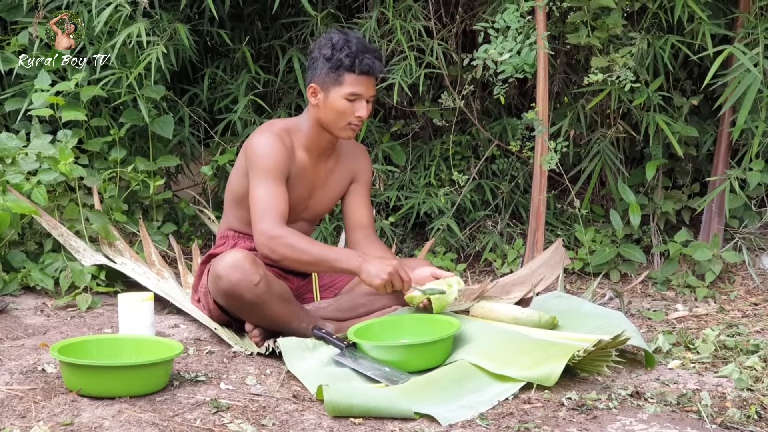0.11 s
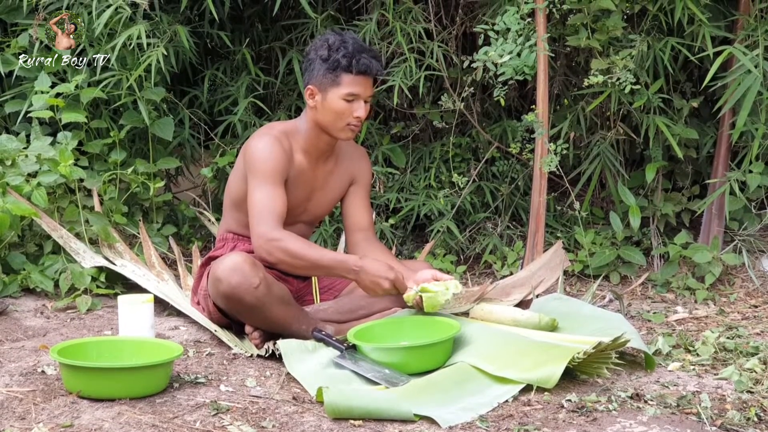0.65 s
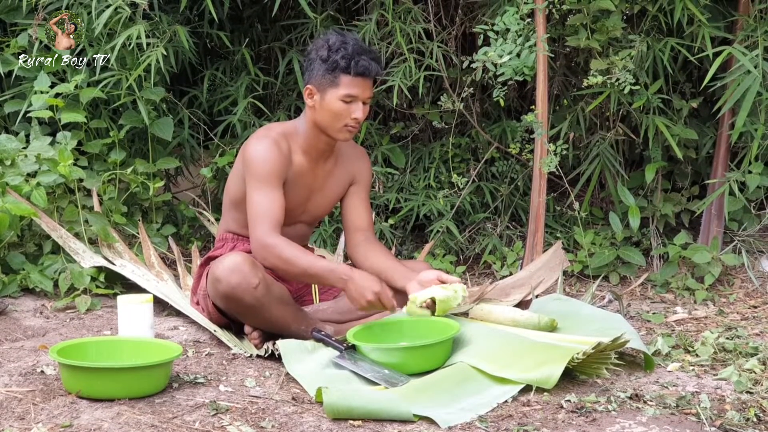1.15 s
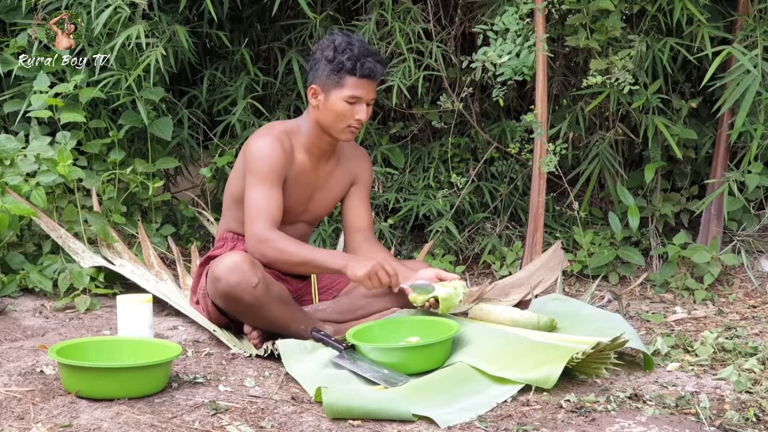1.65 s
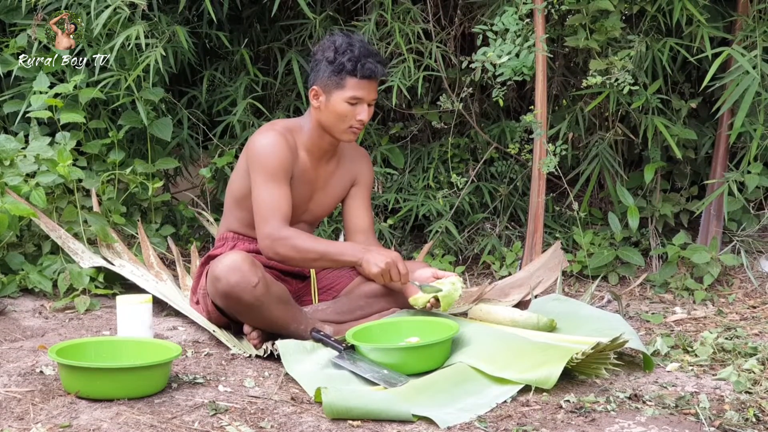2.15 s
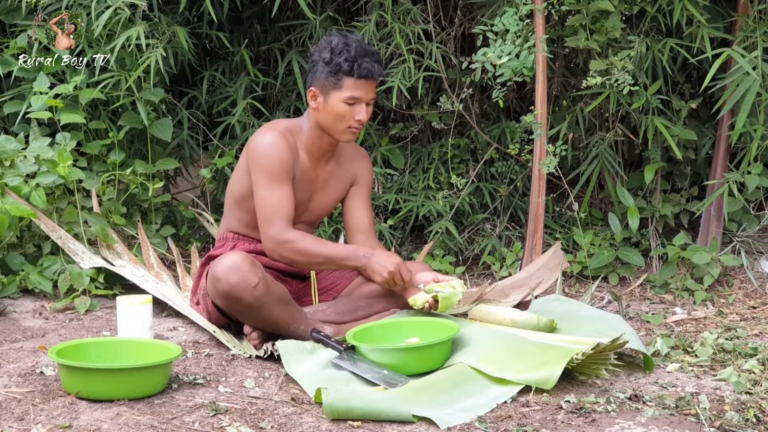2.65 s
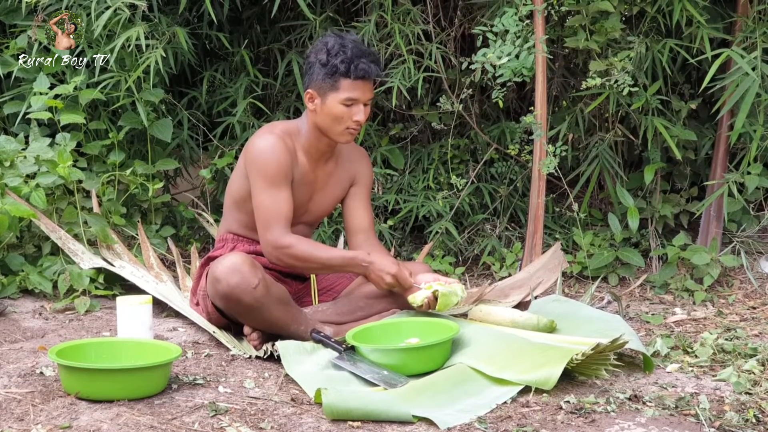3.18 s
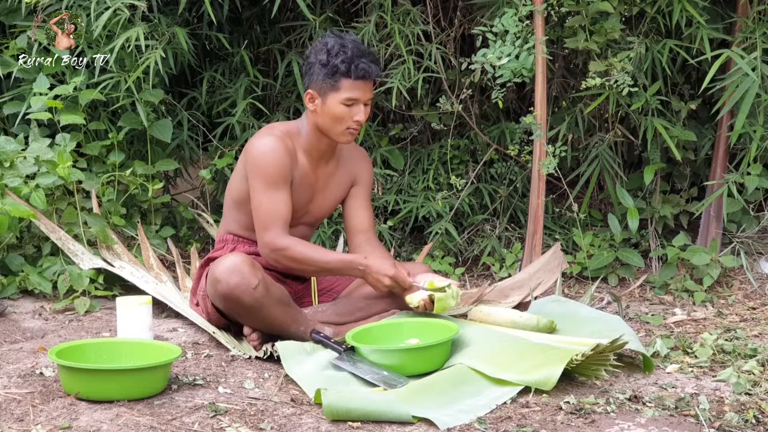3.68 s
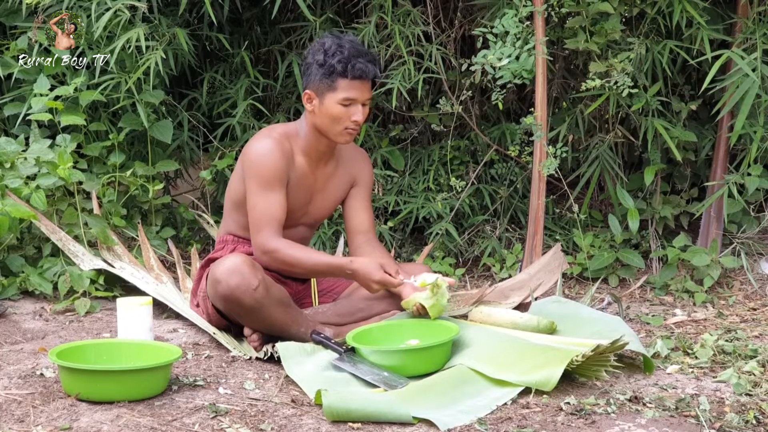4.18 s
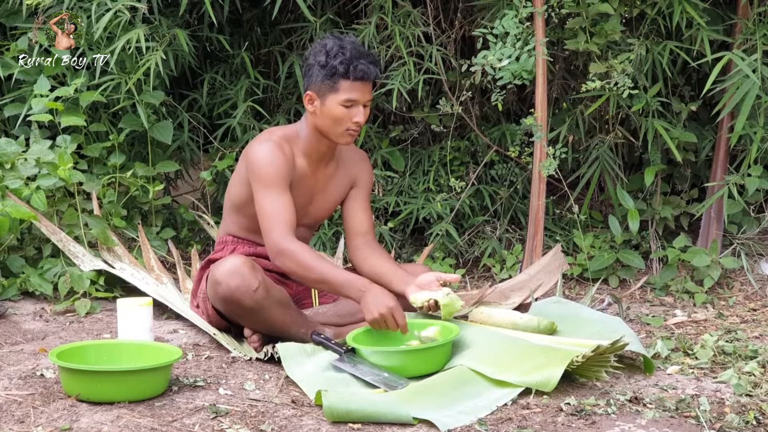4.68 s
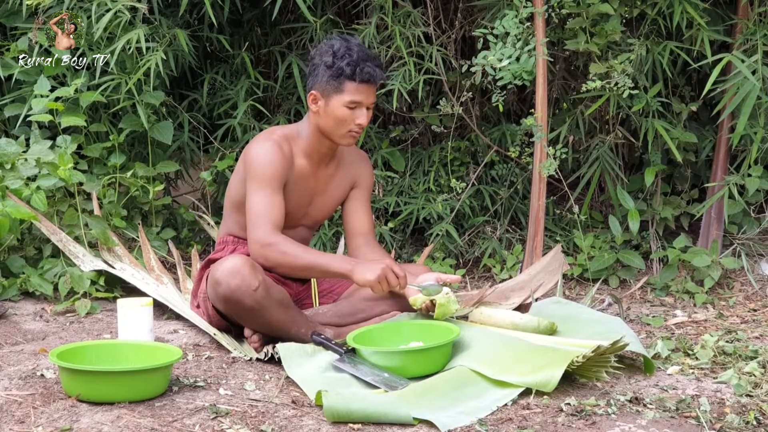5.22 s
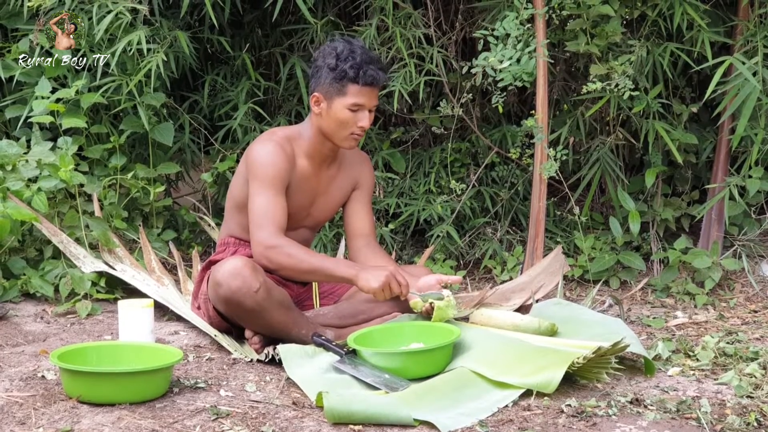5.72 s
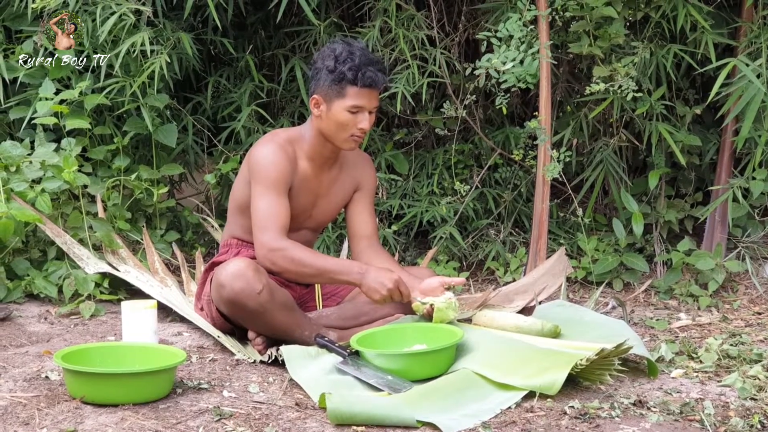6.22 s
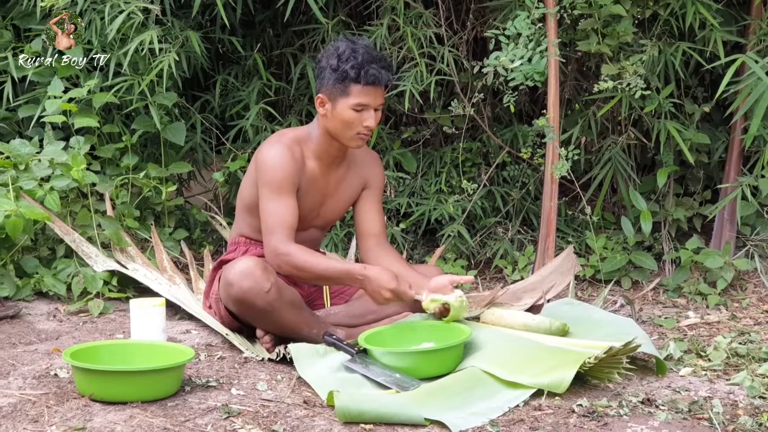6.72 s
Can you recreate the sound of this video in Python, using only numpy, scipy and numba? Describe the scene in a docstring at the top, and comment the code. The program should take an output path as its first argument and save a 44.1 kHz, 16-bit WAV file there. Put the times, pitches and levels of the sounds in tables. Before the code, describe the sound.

Outdoors beside a thicket, a faint engine-like rumble and thin insect hiss lie under small ticks, dull knocks and moist scrapes of a spoon in melon. A sharp snap comes early on the left, then a distant hoarse rooster crows. Sparse birds whistle, a hen clucks briefly, and near the end low bumps and rubbing hit the right side of the stereo microphone.

```python
"""A yard beside a thicket, where a spoon scoops the flesh out of a melon.
Scrapes, squeaks, swishes, rustles and breathy noise around the calls are noise grains under resonances;
ticks, knocks and a snap are struck modes. Far off, a rooster crows in hoarse harmonics, a hen clucks and
birds sing near sines, all with a diffuse tail. Banded noise makes an engine-like rumble and insect hiss;
low noise and decaying swings brush and bump the right side of the microphone."""
import sys
import numpy as np
from scipy import signal
from scipy.io import wavfile
from numba import njit

SR = 44100
rng = np.random.default_rng(int(sys.argv[2]) if len(sys.argv) > 2 else 0)


def natural_amplitude(level_db):
    """Convert a level in decibels to a linear amplitude factor, elementwise."""
    exponent = np.asarray(level_db, float) / 20
    return 10 ** exponent


def digitize_waveform(pressure):
    """Quantize a signal to 16-bit integers and store it at the path in sys.argv[1].

    Rows of a 2-D input are taken as channels; values are limited to [-1, 1].
    """
    field = np.atleast_2d(pressure).T
    bounded = np.clip(field, -1, 1)
    quanta = np.round(bounded * 32767).astype(np.int16)
    wavfile.write(sys.argv[1], SR, quanta)


N = 302085


def rms_one(x):
    """Normalization: the root mean square becomes 1."""
    return x / np.sqrt(np.mean(x ** 2) + 1e-20)


def at_hz(points, hz):
    """Interpolation on a logarithmic frequency axis."""
    points = np.array(points)
    return np.interp(np.log(hz), np.log(points[:, 0]), points[:, 1])


def pan(x, lean_db):
    """Interaural level difference: left minus right is lean_db."""
    return x * natural_amplitude(np.array([[.5], [-.5]]) * lean_db)


def drift(corner_hz, size=N):
    """Low-pass filtered chance: coarse noise through two equal one-pole filters; rms 1."""
    pole = np.exp(-40 * np.pi * corner_hz / SR)      # one coarse step is 20 samples
    coarse = rng.standard_normal(size // 20 + 2002)
    slow = signal.lfilter([1], [1, -2 * pole, pole * pole], coarse)[2000:]
    return np.interp(np.arange(size) / 20, np.arange(len(slow)), rms_one(slow))


def add(out, start, sound):
    """Superposition: lays a sound into the scene from a time on."""
    at = round(max(start, 0) * SR)
    out[:, at:at + sound.shape[1]] += sound[:, :N - at]
    return out


def banded_noise(spectrum, edges, patchy_db, patch_hz):
    """Partially coherent noise: each band has its own level, flicker, likeness and leaning; rms 1."""
    # likeness of the two ears: f/Hz, left-right correlation (clipped to -1..1)
    likeness = [(60, 0.949), (240, 0.807), (950, -0.44), (3770, -0.051), (15000, -0.091)]
    # leaning of the noise: f/Hz, left minus right level/dB
    leaning = [(60, -2), (240, -0.5), (950, 2.5), (3770, 4.0), (15000, 1)]
    out, white = 0, rng.standard_normal((2, 2, N))
    for k, (low, high) in enumerate(zip(edges, edges[1:])):
        band = signal.butter(2, [low, high], "band", fs=SR, output="sos")
        mid, side = signal.sosfilt(band, white[k % 2])
        hz = np.sqrt(low * high)
        alike = np.clip(at_hz(likeness, hz), -1, 1)
        both = np.sqrt(1 + alike) * mid + np.sqrt(1 - alike) * side * [[1], [-1]]
        gain = natural_amplitude(at_hz(spectrum, hz) + patchy_db * drift(patch_hz))
        out = out + gain * pan(both, at_hz(leaning, hz))
    return rms_one(out)


def background():
    """Spectral shaping of noise: a lumpy far rumble under a smooth hiss of insects and leaves."""
    # spectral density of the rumble: f/Hz, relative level/dB per Hz
    rumble_spectrum = [(15, -37), (25, -14.5), (54, 2.5), (88, -0.5), (141, -8.5), (303, -29), (394, -50.5),
                       (500, -26), (650, -70), (1100, -120)]
    # spectral density of the hiss: f/Hz, relative level/dB per Hz
    hiss_spectrum = [(210, -32), (350, -13), (555, -44.5), (739, 3), (1020, -7), (1120, 1.5), (1770, -6.5),
                     (2360, -5.5), (3570, -12), (6860, -7.5), (8310, -21), (13000, -15), (15700, -13.5)]
    # strength of the far rumble: t/s, rms level/dB
    rumble_course = [(0, -45), (.7, -44.5), (1.25, -49.5), (1.8, -46.5), (4, -48.5), (6.85, -48.5)]
    rumble_db = np.interp(np.arange(N) / SR, *np.transpose(rumble_course))
    hiss_db = -66.5
    low, high = np.geomspace(36, 500, 10), np.geomspace(350, 17500, 20)      # band edges in Hz
    rumble = banded_noise(rumble_spectrum, low, patchy_db=2.5, patch_hz=9.3)
    hiss = banded_noise(hiss_spectrum, high, patchy_db=1.3, patch_hz=4.5)
    return natural_amplitude(rumble_db) * rumble + natural_amplitude(hiss_db) * hiss


@njit
def glide(x, hz, q, sr):
    """State-variable resonance: a band-pass whose centre moves."""
    out, low, band = np.zeros(len(x)), 0., 0.
    for i in range(len(x)):
        g = np.tan(np.pi * hz[i] / sr)
        high = (x[i] - (1 / q + g) * band - low) / (1 + g / q + g * g)
        mid = g * high + band
        band = mid + g * high
        low += 2 * g * mid
        out[i] = mid
    return out


def stroke(length, hz0, hz1, q):
    """Granular noise: dense grains drive a resonance that may slide; rms about 1."""
    u = np.linspace(0, 1, round(length * SR))
    hz = hz0 * (hz1 / hz0) ** u
    struck = rng.random(len(u)) < 9000 / SR      # 9000 grains per s
    sizes = natural_amplitude(2 * np.minimum(rng.exponential(1, len(u)), 4)) * struck
    grains = rms_one(sizes) * rng.standard_normal((2, len(u)))
    shaped = np.array([glide(glide(g, hz, q, SR), hz, q / 2, SR) for g in grains])
    swell = 1.166 * np.sin(np.pi * u ** 0.76) ** 1.28
    flutter_db, flutter_hz = .8, 72      # rms depth, corner of the drift
    return swell * natural_amplitude(flutter_db * drift(flutter_hz, len(u))) * rms_one(shaped)


def swishes():
    """Broadband friction: hand and flesh give grains under a very low Q."""
    # swishes: start t/s, length t/s, centre f/Hz, level/dB, left minus right level/dB
    swish_rows = [(0, 0.052, 2480, -63.5, -1), (0.284, 0.12, 10000, -71, 8), (1.159, .47, 8300, -66, -2),
                  (1.714, 0.08, 2000, -66.5, -1), (5.638, 0.11, 8000, -71.5, -9)]
    out = np.zeros((2, N))
    for start, length, hz, db, lean_db in swish_rows:
        add(out, start, pan(natural_amplitude(db) * stroke(length, hz, hz, q=0.35), lean_db))
    return out


def ring(clicks, hz, t60):
    """Impulse response of a damped mode: a unit click sets a sine of height 1 ringing."""
    r, w = natural_amplitude(-60 / (t60 * SR)), 2 * np.pi * hz / SR
    return signal.lfilter([0, np.sin(w)], [1, -2 * r * np.cos(w), r * r], clicks)


def snap():
    """Modal impulse: one sharp snap close on the left rings two short high modes."""
    # modes of the snap: f/Hz, level/dB, decay t60/s
    snap_modes = [(7030, -2, 0.0024), (10000, -3.5, 0.0014)]
    start_s, level_db, right_db = .2889, -21, -42      # right_db is relative to the left
    click = signal.unit_impulse(SR // 20)
    body = sum(natural_amplitude(level_db + mode_db) * ring(click, hz, t60) for hz, mode_db, t60 in snap_modes)
    body = signal.sosfilt(signal.butter(3, 5000, "high", fs=SR, output="sos"), body)
    return add(np.zeros((2, N)), start_s, body * natural_amplitude([[0], [right_db]]))


def ticks():
    """Impulsive fracture: a click and a tiny crunch of tearing fibres excite a few cycles of ring, without bass."""
    # ticks: t/s, peak level/dB midway between the ears, ring f/Hz, left minus right level/dB
    tick_rows = [(0.322, -56.5, 2620, -0.5), (0.6762, -56, 9500, -12.5), (1.08, -57, 4050, 8),
                 (1.3717, -51, 7400, 2), (1.4283, -59, 9110, -8), (1.7268, -57, 2900, 3),
                 (1.8406, -55, 9400, -11), (1.959, -54.5, 7400, 2), (2.1327, -57.5, 3480, 6.5),
                 (2.979, -56, 5900, 11), (3.452, -53, 2260, 1), (3.6285, -58, 2280, -8),
                 (3.935, -59, 3160, 10), (4.966, -50.5, 5300, 4), (6.0597, -51, 1916, -14),
                 (6.061, -53, 3700, -12), (6.107, -56, 2960, -17), (6.137, -49, 6250, 9),
                 (6.145, -55, 5400, 6), (6.153, -57.5, 1050, -5), (6.2687, -54, 2070, -7),
                 (6.3814, -53.5, 6500, -3), (6.398, -54.5, 2034, -18), (6.678, -54.5, 1670, -9),
                 (6.748, -58, 1900, -8), (6.8198, -49.5, 2360, -10), (6.82, -56, 1100, -8)]
    crunch_strength, crunch_t60_s = 0.21, 0.017
    out, click = np.zeros((2, N)), signal.unit_impulse(SR // 20)
    fade = natural_amplitude(-60 * np.arange(len(click)) / SR / crunch_t60_s)
    for s, db, hz, lean_db in tick_rows:
        crunch = click + crunch_strength * fade * rng.standard_normal(len(click))
        edges = [hz / 1.66, min(hz * 1.51, SR / 2.5)]
        band = signal.butter(2, edges, "band", fs=SR, output="sos")
        tick = signal.sosfilt(band, ring(crunch, hz, 5.1 / hz))
        add(out, s, pan(natural_amplitude(db) * tick / np.abs(tick).max(), lean_db))
    return out


def far_tone(hz, rough, waver_hz):
    """Fading by scattering, as through leaves and echoes: each ear has its own wavering strength and phase; rms 1."""
    turn = np.exp(2j * np.pi * np.cumsum(hz) / SR)
    rough = np.clip(rough, 0, 1)
    ears = []
    for ear in range(2):
        scattered = drift(waver_hz, len(hz)) + 1j * drift(waver_hz, len(hz))
        ears.append(np.sqrt(2 - 2 * rough) + np.sqrt(rough) * scattered)
    lag = np.array([[1], [1j]])      # the two ears are a quarter turn apart
    return np.real(turn * lag * ears)


def birds():
    """Frequency-modulated near sines: far notes swell fast, die away and waver."""
    # bird notes: start t/s, length t/s, start f/Hz, end f/Hz, level/dB
    bird_notes = [(.341, 0.123, 2610, 2560, -72), (2.349, 0.2, 1144, 800, -67),
                  (2.495, 0.19, 1440, 1452, -70), (2.69, 0.2, 1120, 1135, -73),
                  (2.77, 0.086, 760, 720, -69), (2.89, .12, 860, 870, -74), (2.887, 0.18, 1765, 1750, -67),
                  (3.1, 0.08, 785, 783, -71), (3.36, 0.24, 2320, 2310, -71.5),
                  (3.617, 0.2, 4280, 4355, -66), (3.701, 0.46, 1449, 1443, -70),
                  (3.718, 0.2, 2930, 2880, -68.5), (3.779, 0.12, 5300, 5320, -68.5),
                  (4.02, 0.15, 4745, 4680, -74), (4.2, 0.14, 5150, 5230, -72),
                  (4.415, 0.15, 3150, 3650, -63.5), (4.76, 0.16, 3500, 4130, -62.5),
                  (5.19, 0.12, 2290, 2050, -64)]
    leap_share = .35      # a rising note reaches its top in this share of its length
    wavers_per_note, waver_share = 5.4, 0.0075      # the waver quickens in short notes and at high pitch
    out = np.zeros((2, N))
    for start, length, hz0, hz1, db in bird_notes:
        u = np.linspace(0, 1, round(length * SR))
        swell = np.sin(np.pi * u ** 0.62) ** 1.15
        if hz1 > hz0:
            course = np.sin(np.pi / 2 * np.minimum(u / leap_share, 1))
        else:
            course = u ** 2      # a falling note holds, then drops
        waver_hz = wavers_per_note / length + waver_share * hz0
        tone = far_tone(hz0 + (hz1 - hz0) * course, 0.71, waver_hz)
        add(out, start, natural_amplitude(db) * swell * tone)
    return out


def rooster():
    """Harmonic voice: a hoarse crow in one breath arches in pitch; the throat favours the second harmonic."""
    # the crow: t/s, second harmonic f/Hz, effort level/dB
    crow_course = [(.6, 1469, -88), (.64, 1497, -73), (.7, 1520, -60), (.73, 1513, -67), (.755, 1495, -85),
                   (.785, 1514, -70), (.845, 1525, -77), (.9, 1635, -60), (.99, 1641, -67.5),
                   (1.015, 1548, -74), (1.05, 1580, -66), (1.1, 1637, -59.5), (1.38, 1583, -61.5),
                   (1.41, 1579, -72), (1.56, 1573, -80), (1.62, 1470, -95), (1.69, 1510, -77),
                   (1.76, 1482, -75), (1.8, 1455, -64.5), (1.85, 1437, -60), (1.92, 1405, -78),
                   (2.04, 1390, -85)]
    # strength of the harmonics: harmonic number, level/dB
    crow_harmonics = [(1, -3.5), (2, 5), (3, -15.5)]
    # hoarseness along the crow: t/s, share of scattered tone (0-1)
    hoarseness = [(.83, .2), (.9, .5), (1.6, .5), (1.7, .2)]
    side_rough, waver_hz = .6, 46      # the weak harmonics are always hoarse
    clear_dim_db = 3      # clear stretches carry less besides the second harmonic
    s, second_hz, level_db = np.transpose(crow_course)
    now = np.arange(s[0], s[-1], 1 / SR)
    hz, rough = np.interp(now, s, second_hz), np.interp(now, *np.transpose(hoarseness))
    call = 0
    for k, db in crow_harmonics:
        gain = natural_amplitude(db - clear_dim_db * (k != 2) * (rough < .3))
        call = call + gain * far_tone(hz * k / 2, rough if k == 2 else side_rough, waver_hz)
    return add(np.zeros((2, N)), s[0], pan(call * natural_amplitude(np.interp(now, s, level_db)), 1.0))


def rustles():
    """Granular friction close on the right: grains under a fixed resonance."""
    # rustles: start t/s, length t/s, centre f/Hz, level/dB
    rustle_rows = [(0.657, 0.24, 9160, -76), (5.552, 0.66, 1750, -71), (5.635, 0.12, 1820, -67.5),
                   (5.655, 0.083, 1040, -68), (5.929, 0.048, 1200, -71.5), (6.089, 0.19, 1836, -70.5),
                   (6.203, .89, 1970, -74.5), (6.374, 0.26, 9800, -76.5)]
    out = np.zeros((2, N))
    for start, length, hz, db in rustle_rows:
        add(out, start, pan(natural_amplitude(db) * stroke(length, hz, hz, q=2.06), -12.5))
    return out


def broad_slides():
    """Low-Q sliding noise, a little left: scrapes, and the breathy noise around the hen's cluck."""
    # broad slides: start t/s, length t/s, start f/Hz, end f/Hz, level/dB
    broad_rows = [(.69, .19, 5700, 3900, -66.5), (3.303, .32, 2800, 2700, -70),
                  (3.262, 0.38, 1700, 1500, -72.5), (3.429, 0.12, 2580, 2340, -62.5),
                  (5.09, .22, 5000, 3600, -66), (5.204, .15, 1250, 1560, -65),
                  (5.347, .31, 1600, 1500, -64.5), (5.215, .4, 830, 950, -72.5),
                  (6.123, 0.063, 5900, 5600, -68), (6.363, 0.26, 4900, 4600, -70)]
    out = np.zeros((2, N))
    for start, length, hz0, hz1, db in broad_rows:
        add(out, start, pan(natural_amplitude(db) * stroke(length, hz0, hz1, q=2), 1))
    return out


def narrow_slides():
    """Higher-Q sliding bands of noise: some squeak, some lie breathily around the bird notes."""
    # narrow slides: start t/s, length t/s, start f/Hz, end f/Hz, level/dB
    narrow_rows = [(0.775, 0.11, 4050, 3800, -64), (4.0, 0.14, 4800, 4900, -76),
                   (4.18, .17, 5100, 5100, -74.5), (4.376, 0.24, 2600, 3500, -71),
                   (4.741, .2, 3460, 4100, -68.5), (5.31, 0.13, 1320, 2300, -64),
                   (5.44, .14, 1750, 2300, -68), (5.22, .14, 1800, 1500, -68),
                   (5.13, .16, 3100, 2900, -66.5)]
    out = np.zeros((2, N))
    for start, length, hz0, hz1, db in narrow_rows:
        add(out, start, pan(natural_amplitude(db) * stroke(length, hz0, hz1, q=6.5), 1))
    return out


def knocks():
    """Modal excitation: dull knocks of spoon on fruit send a click into the fruit's modes."""
    # knocks: t/s, level/dB, left minus right level/dB
    knock_rows = [(1.726, -56, 4), (4.109, -72, 1), (4.966, -65, 2), (5.221, -58.5, 2.5), (6.144, -63, 6)]
    # modes of the fruit: f/Hz, level/dB, decay t60/s
    fruit_modes = [(661, 3.5, 0.024), (1096, -1.5, 0.057), (1750, -0.5, 0.021), (2690, -8.5, 0.026)]
    out, click = np.zeros((2, N)), signal.unit_impulse(SR // 20)
    for s, db, lean_db in knock_rows:
        body = sum(natural_amplitude(mode_db + rng.normal(0, 0.76)) * ring(click, hz, t60)
                   for hz, mode_db, t60 in fruit_modes)
        add(out, s, pan(natural_amplitude(db) * body, lean_db))
    return out


def syllable(swell, hold, top_hz, db, scoop):
    """Pitch and level envelopes of the cluck, trail included."""
    scoop_s, sag_per_s = 0.0504, 0.2      # the scoop settles while the pitch sags (share per s)
    swell_db, drop_db, drop_s, trail_db_per_s = 10, 14, 0.02, 150      # swells, holds, drops, trails off
    t, stop = np.arange(0, swell + hold + .3, 1 / SR), swell + hold
    hz = top_hz * (1 - scoop * np.exp(-t / scoop_s) - sag_per_s * np.minimum(t, stop))
    after = np.maximum(t - stop, 0)
    fall_db = drop_db * np.minimum(after / drop_s, 1) + trail_db_per_s * after
    return hz, db - swell_db * np.maximum(1 - t / swell, 0) - fall_db


def hen():
    """Source and filter: the throat colours the harmonics of a short rough cluck."""
    # the cluck: start t/s, swell t/s, hold t/s, f/Hz before scoop and sag, level/dB, scoop (share of pitch)
    cluck = (5.355, 0.02, 0.08, 385, -69, .08)
    # response of the throat: f/Hz, level/dB
    throat = [(750, -6), (1120, 3), (1500, 5.5), (1870, 4), (2230, 11.5), (2700, -34)]
    hz, level_db = syllable(*cluck[1:])
    call = sum(natural_amplitude(at_hz(throat, hz * k)) * far_tone(hz * k, 0.73, waver_hz=70) for k in range(2, 8))
    return add(np.zeros((2, N)), cluck[0], call * natural_amplitude(level_db))


def right_port():
    """Contact noise: lumpy low rubbing and damped thumps reach mostly the right capsule."""
    # brushes: peak t/s, level/dB before the split between the ears
    brushes = [(5.44, -67), (5.69, -58), (5.78, -64), (5.94, -61.5), (6.43, -64.5)]
    # bumps: t/s, level/dB on the right, settled swing f/Hz, decay t60/s
    bumps = [(5.666, -43.5, 200, 0.034), (5.682, -41.5, 200, .03), (5.696, -40, 191.6, 0.036),
             (5.712, -44, 170, .04), (5.798, -45, 120, .06), (5.858, -38, 110, 0.11),
             (5.891, -32, 132, 0.053), (5.932, -40, 170, 0.039), (5.955, -40.5, 250, 0.028),
             (6.3823, -25.5, 70, 0.074), (6.3953, -23, 67, 0.029)]
    rise_db_per_s, fall_db_per_s = 299, 139
    now, t = np.arange(N) / SR, np.arange(SR // 8) / SR
    pressure = sum(natural_amplitude(db - np.maximum(rise_db_per_s * (s - now), fall_db_per_s * (now - s)))
                   for s, db in brushes)
    band = signal.butter(3, [130, 440], "band", fs=SR, output="sos")
    rub = signal.sosfilt(band, rng.standard_normal(N))
    out = rms_one(rub * natural_amplitude(3.8 * drift(46.0))) * pressure * natural_amplitude([[-14], [6]])
    for s, db, hz, t60 in bumps:
        swing_hz = hz + 250 * np.exp(-t / 0.0019)      # the swing starts stiff and slackens
        thump = np.sin(2 * np.pi * np.cumsum(swing_hz) / SR) * natural_amplitude(-60 * t / t60)
        add(out, s, natural_amplitude(db) * thump * natural_amplitude([[-22], [0]]))
    return out


def thicket(far, t60, level_db):
    """Diffuse reverberation: trunks and leaves scatter far calls into a short tail."""
    t = np.arange(SR // 2) / SR
    tail = rng.standard_normal((2, len(t))) * natural_amplitude(-60 * t / t60)
    tail = tail / np.sqrt(np.sum(tail ** 2, axis=1, keepdims=True))
    return far + natural_amplitude(level_db) * signal.fftconvolve(far, tail, axes=1)[:, :N]


def scene():
    """Superposition: far calls pass through the thicket, and all other sounds are added without it."""
    far = thicket(birds() + rooster() + hen(), t60=.3, level_db=-11)
    struck = snap() + ticks() + knocks()
    grainy = swishes() + rustles() + broad_slides() + narrow_slides()
    return background() + struck + grainy + far + right_port()


def low_pass(x):
    """Removes everything above the highest recorded frequency."""
    return signal.sosfilt(signal.butter(12, 16380, fs=SR, output="sos"), x)


def record(dry):
    """Band limitation: a high-pass cuts the bottom and a steep low-pass the top."""
    cut = signal.sosfilt(signal.butter(2, 35, "high", fs=SR, output="sos"), dry)
    # 60 dB down from 16 kHz upward
    mix = signal.sosfilt(signal.cheby2(12, 60, 16000, fs=SR, output="sos"), cut)
    return low_pass(mix)


dry = scene()
out = record(dry)
digitize_waveform(out)
```